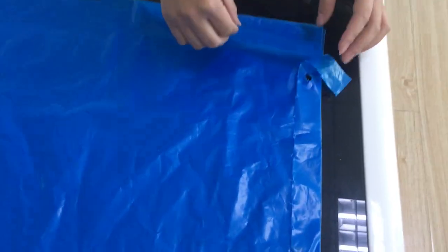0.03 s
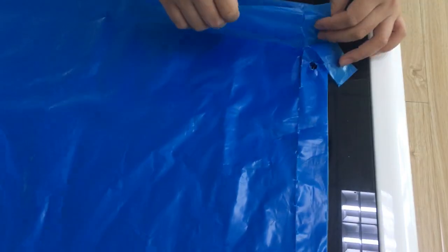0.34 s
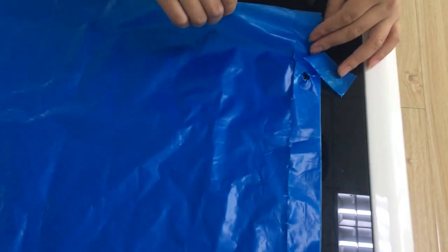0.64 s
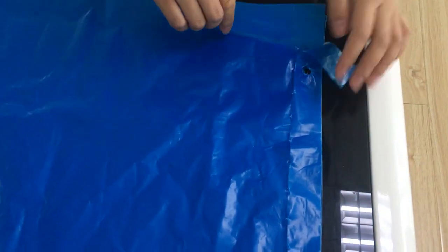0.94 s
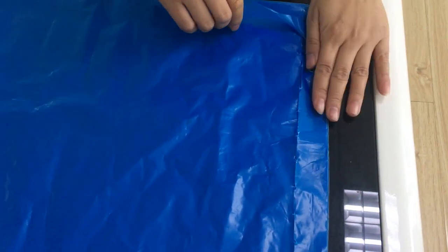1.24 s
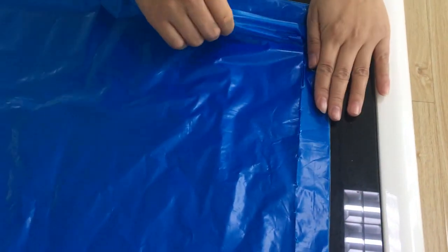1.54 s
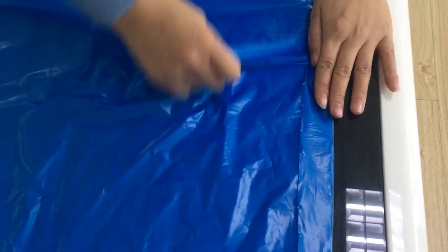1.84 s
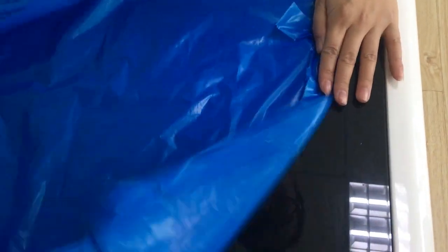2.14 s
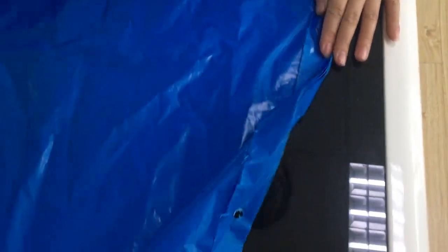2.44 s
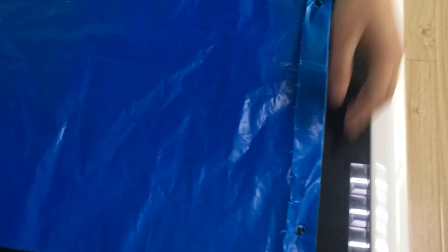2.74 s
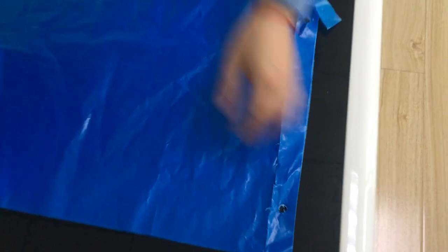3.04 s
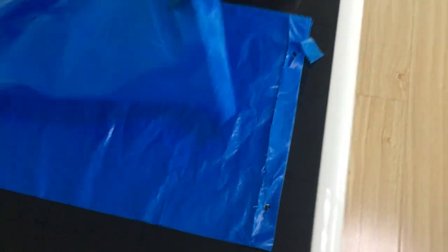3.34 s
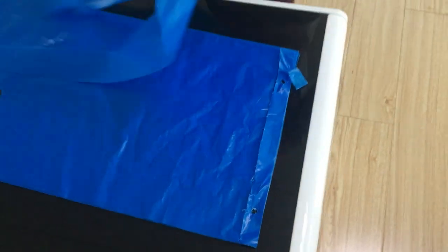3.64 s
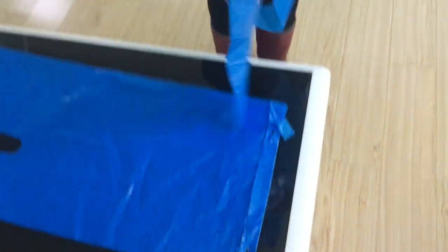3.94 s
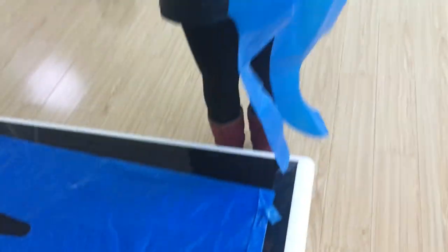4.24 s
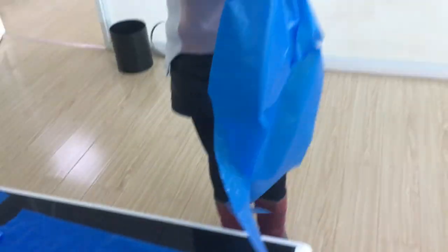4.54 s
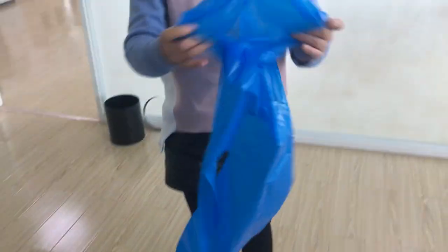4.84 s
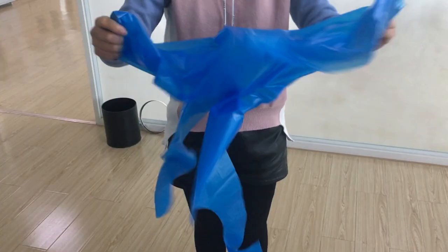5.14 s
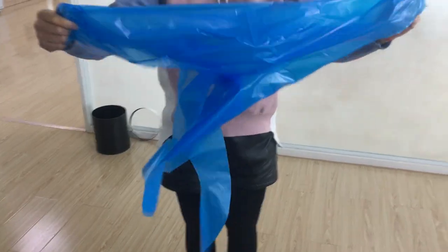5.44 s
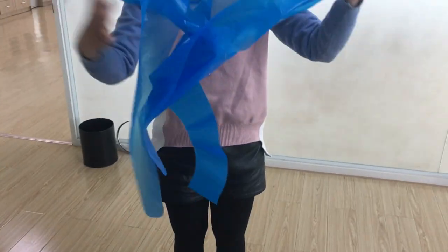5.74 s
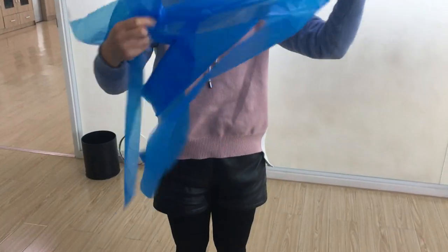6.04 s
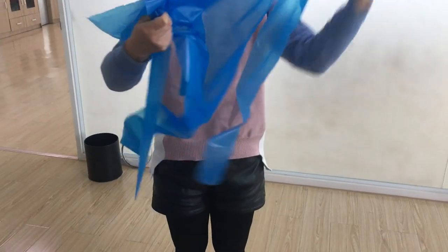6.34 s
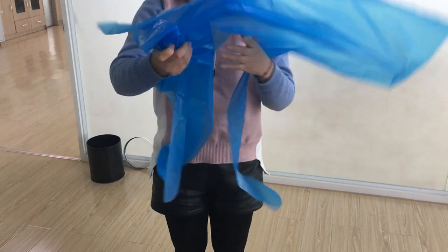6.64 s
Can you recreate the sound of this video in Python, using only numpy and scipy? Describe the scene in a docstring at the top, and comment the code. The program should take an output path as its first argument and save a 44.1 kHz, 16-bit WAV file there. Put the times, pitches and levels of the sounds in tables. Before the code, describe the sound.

A low ventilation rumble runs throughout, in a hard-floored room with a short echo. For the first second and a half, fingertips rub softly on a thin plastic apron close by, with a few faint ticks. At about 1.3 seconds a palm lands on the table with a soft, dull knock. From 1.8 seconds the plastic stretches and ticks, then rips off its pad between 2 and 2.3 seconds in a ragged zip of sharp snaps with a low swish. This is the loudest moment. From 2.5 to 4.6 seconds the loose sheet is lifted, giving quieter rustles, brushing swishes and scattered clicks. At about 4.8 seconds it is shaken open in bursts of dense, papery crackling, with a soft, low flap of air near 6.1 seconds. The crinkling eases off just before 7 seconds.

```python
"""Tearing off a plastic apron

A thin plastic apron is ripped off its pad on a table, in a hard-floored room with rumbling ventilation.
Fingertips rub the film, a hand lands on the table, and the perforation gives way in a run of snaps.
The loose sheet is lifted and shaken open: its creases buckle in dense crackles as it flaps the air."""
import sys
import numpy as np
from scipy import signal
from scipy.fft import rfft, irfft
from scipy.io import wavfile
from scipy.ndimage import uniform_filter1d

SR = 44100
rng = np.random.default_rng(int(sys.argv[2]) if len(sys.argv) > 2 else 0)


def store_pcm(level_fs):
    """Save levels as 16-bit WAV."""
    pcm = np.round(np.clip(level_fs, -1, 1) * 32767).astype(np.int16)
    wavfile.write(sys.argv[1], SR, np.atleast_2d(pcm).T)


N = 299880
TIME = np.arange(N) / SR

# The tone of the ventilation. Each row: frequency in Hz, relative level in dB.
VENTILATION_COLOUR = [(15, -32), (25, -43), (43, -9), (108, -9.5), (153, -7), (200, -5.5), (242, -10.5),
                      (344, -12.5), (439, -19), (659, -20), (796, -21), (1440, -21.5), (2760, -28.5),
                      (5000, -45), (16000, -46.5)]
# Low notes of the room that the ventilation keeps booming. Each row: pitch in Hz, width in Hz, level in dB.
ROOM_BOOMS = [(62, 8.2, -63), (102.7, 8, -65), (172, 19, -65.5)]
# Fingertips feel for the film's edge. Each row: peak time, rise and fall in seconds, relative level in dB.
FINGER_RUBS = [(0.02, .05, 0.47, -68.5), (0.345, 0.019, 0.1, -60.5), (0.55, .1, .05, -62.5),
               (0.815, .012, 0.11, -64.5), (1.23, 0.12, 0.25, -65.5), (1.52, .012, 0.049, -64.5)]
# The tone of the rubbed or rustling sheet. Each row: frequency in Hz, relative level in dB.
SHEET_COLOUR = [(140, -27), (240, -1), (347, 0.5), (511, -9), (996, -1.5), (1440, -2.5), (1910, 0.5),
                (2860, -2), (3230, -1.5), (7520, -6.5), (9120, -5.5), (10500, -8.5), (12100, -8),
                (15200, -11), (16000, -32)]
# A bridge in the perforation breaks or a crease flips.
# Each row: time in seconds, relative level in dB, pitch in Hz.
FILM_SNAPS = [(0.425, -41, 4200), (0.4382, -35, 9800), (0.7364, -46.5, 3280), (0.793, -49, 2580),
              (1.3033, -45, 8300), (1.3396, -44, 9200), (1.4953, -32, 7250), (1.528, -44, 4180),
              (1.6521, -45, 5600), (1.7923, -44, 5100), (1.8125, -33.5, 4970), (1.8355, -30, 5800),
              (1.8815, -32, 5470), (1.895, -24, 8200), (1.9465, -20, 9200), (1.9817, -16.5, 5700),
              (1.9912, -22, 6110), (2.004, -16.5, 3980), (2.0081, -17, 2980), (2.015, -15, 7500),
              (2.037, -17, 3950), (2.0553, -15, 2540), (2.0946, -16, 3960), (2.102, -16, 4400),
              (2.1151, -20, 2700), (2.1427, -13, 7400), (2.187, -18, 5940), (2.2246, -16, 5000),
              (2.251, -22, 4680), (2.275, -20.5, 4570), (2.2997, -25, 7400), (2.5297, -28, 6000),
              (2.6833, -20, 10300), (2.9767, -31, 8000), (3.0305, -30, 5800), (3.3087, -34.5, 4100),
              (3.339, -36, 3700), (3.4046, -30.5, 4970), (3.7773, -37, 3900), (4.565, -38, 6030),
              (5.3348, -25, 5000), (3.512, -27, 11600), (4.1804, -29.5, 6070), (4.341, -29, 10300),
              (4.3595, -30, 9500), (5.48, -25, 8500), (5.5275, -23.5, 8450), (5.938, -24.5, 10800),
              (6.1019, -26.5, 4000), (6.24, -26.5, 7900), (6.7702, -30, 7040)]
# The notes of the table top. Each row: pitch in Hz, width in Hz, relative level in dB.
TABLE_NOTES = [(327, 70, 4), (433, 100, 2), (580, 130, 4), (760, 270, 2), (920, 170, 2)]
# The tear runs along the pad.
# Each row: time in seconds, relative levels of wide folds and of fine creases in dB.
TEAR_LEVELS = [(1.85, -49.5, -64), (1.9, -47, -43), (1.975, -37, -35), (2.025, -36.5, -47),
               (2.06, -26, -31), (2.14, -27.5, -27), (2.275, -31.5, -36), (2.32, -42.5, -52),
               (2.42, -53, -78)]
# The tone of the tear. Each row: frequency in Hz, relative level in dB.
TEAR_COLOUR = [(150, -20), (250, -6.5), (538, -3.5), (662, 0.5), (761, 0.5), (1980, 3), (2710, -5),
               (3170, 1), (4990, -7), (6250, -4), (7570, -9), (8850, -6.5), (10400, -9.5), (12100, -8),
               (16000, -11)]
# The tear jumps ahead. Each row: start and length in seconds, boost in dB.
TEAR_SPURTS = [(2.005, 0.0078, 17.5), (2.05, 0.012, 4), (2.073, 0.0046, 7.5), (2.118, 0.014, 3)]
# The sheet swishes. Each row: peak time, rise and fall in seconds, relative level in dB,
# lowest and highest frequency in Hz.
SHEET_SWISHES = [(2.2, 0.15, 0.1, -39, 60, 226), (3.2, .02, 0.022, -54, 282, 870),
                 (3.445, 0.066, 0.07, -49.5, 282, 880), (6.14, 0.054, 0.094, -43.5, 46, 80)]
# The hanging sheet never quite rests. Each row: time in seconds, relative level in dB.
SHEET_STIRRING = [(2.36, -53.5), (2.9, -60), (3.75, -60), (4.3, -58.5), (4.6, -54.5), (5.3, -48),
                  (5.85, -55), (6.8, -54.5)]
# The hands move the loose sheet.
# Each row: peak time, rise and fall in seconds, relative level in dB, extra treble in dB.
HAND_MOVES = [(2.54, 0.042, .07, -54, 5), (2.66, .05, 0.088, -44.5, -0.5), (2.848, 0.0044, 0.057, -54, 2),
              (3.04, .008, 0.051, -52.5, -9), (3.189, 0.005, 0.031, -44.5, 0),
              (3.441, 0.083, 0.095, -43, -0.5), (3.781, 0.0068, 0.048, -51.5, -6),
              (3.965, 0.054, 0.076, -49.5, -3), (4.185, 0.0091, 0.072, -49.5, -4),
              (4.35, 0.0088, 0.072, -54.5, -1), (4.88, 0.072, 0.19, -45, 4.5),
              (5.01, 0.051, 0.27, -39.5, 2.5), (5.345, 0.05, 0.054, -39, 0.5),
              (5.5, 0.087, 0.073, -45.5, 3), (5.689, 0.05, 0.079, -41.5, 1.5),
              (5.95, .014, 0.23, -47.5, 2.5), (6.135, 0.062, 0.078, -36, 0.5), (6.44, 0.17, 0.092, -46, 1),
              (6.575, 0.056, .055, -43.5, -1), (6.78, 0.017, .06, -52.5, -1)]
# How long the room rings. Each row: frequency in Hz, seconds to fade by 60 dB.
ROOM_DECAY = [(200, 0.66), (1000, 0.61), (4000, 0.45), (14000, 0.39)]
# Echoes from table, body and floor. Each row: delay in seconds, level in dB against the direct sound.
CLOSE_ECHOES = [(.0029, -21.5), (.0066, -38), (0.017, -19.5), (0.0248, -20.5)]
# Peaks and dips of the microphone's opening. Each row: frequency in Hz, width in Hz, boost or cut in dB.
MICROPHONE_PORT = [(463, 34, 0), (587, 54, 1.5), (2700, 270, -1), (3480, 1200, 2.5), (7800, 930, -1.5),
                   (9200, 1500, 0), (10380, 410, -5)]


def from_db(db):
    """Turn decibels into a gain, a number to multiply a sound by."""
    return 10 ** (np.asarray(db) / 20)


def unit_power(x):
    """Scale a signal to an average power of one."""
    return x / np.sqrt(np.mean(x ** 2) + 1e-20)


def steady(x, window_s=0.046):
    """Even out the loudness but keep the fine grain."""
    power = np.abs(uniform_filter1d(x ** 2, int(window_s * SR)))
    return x / np.sqrt(power + 1e-12)


def gain_curves(rows, fade_s=0.017):
    """Make a gain curve from each dB column, fading out beyond the table's ends."""
    times, *columns = np.transpose(rows)
    inside = np.interp(TIME, [times[0] - fade_s, times[0], times[-1], times[-1] + fade_s], [0, 1, 1, 0])
    return [inside * from_db(np.interp(TIME, times, db)) for db in columns]


def swell(peak_s, rise_s, fall_s, db):
    """The gain of one gesture grows to a peak and dies away."""
    since = TIME - peak_s
    distance = np.abs(since) / np.where(since < 0, rise_s, fall_s)
    return from_db(db) * np.exp(-np.minimum(distance, 20))


def together(gains):
    """Combine the gains of unrelated sounds by adding their powers."""
    return np.sqrt(sum(gain ** 2 for gain in gains))


def drift(per_s):
    """A curve that wanders to a new random value per_s times a second."""
    points = rng.standard_normal(N // 20)
    return unit_power(np.interp(TIME * per_s, np.arange(len(points)), points))


def add(out, start_s, sound):
    """Mix a sound in at the given time."""
    i = int(np.clip(round(start_s * SR), 0, N - 1))
    out[i:i + len(sound)] += sound[:N - i]


def at_hz(table, hz):
    """Look up a frequency in a table, sliding smoothly between rows."""
    frequencies, values = np.transpose(table)
    return np.interp(np.log(hz + 1), np.log(frequencies), values)


def passband(x, hz, kind, order=2):
    """Let only the "low", the "high" or a "band" of frequencies through."""
    return signal.sosfilt(signal.butter(order, np.clip(hz, 10, .48 * SR), kind, fs=SR, output="sos"), x)


def resonance(x, hz, width_hz):
    """Ring at one pitch: the narrower the width, the longer the ring."""
    return signal.lfilter(*signal.iirpeak(hz, hz / width_hz, fs=SR), x)


def coloured(x, colour, size=8192):
    """Give a sound the tone set out in a colour table."""
    gains = from_db(at_hz(colour, np.linspace(0, SR / 2, size // 2 + 1)))
    cepstrum = irfft(np.log(gains))
    cepstrum[1:size // 2] *= 2   # folded so that the filter rings after a click, never before
    cepstrum[size // 2 + 1:] = 0
    return signal.fftconvolve(x, irfft(np.exp(rfft(cepstrum))))[:N]


def room(x, tail_db):
    """Direct sound, a few close echoes and a smooth tail that dies sooner in the treble."""
    t, response = TIME[:SR // 2], 0
    edges_hz = np.geomspace(80, 20480, 9)
    for low, high in zip(edges_hz, edges_hz[1:]):
        band = passband(rng.standard_normal(len(t)), [low, high], "band")
        response = response + band * 1000 ** (-t / at_hz(ROOM_DECAY, np.sqrt(low * high)))
    response *= 1 - np.exp(-t / 0.0072)
    response *= from_db(tail_db) / np.sqrt(np.sum(response ** 2))
    response[0] = 1   # the direct sound
    for delay_s, db in CLOSE_ECHOES:
        response[round(delay_s * SR)] += from_db(db)
    return signal.fftconvolve(x, response)[:N]


def moving_room(x, tail_db, paths=6):
    """The sheet keeps moving, so its clicks take different paths through the room."""
    path = rng.integers(0, paths, N)
    return sum(room(x * (path == k), tail_db) for k in range(paths))


def buckles(per_s, spread_db, limit=3.9):
    """Creases flip at random moments, making clicks of varied size."""
    sizes = from_db(spread_db * np.minimum(rng.exponential(1, N), limit))
    signs = rng.choice([-1, 1], N)
    return sizes * signs * (rng.random(N) < per_s / SR)


def ticks(per_s, spread_db, low_hz):
    """Tiny creases flip one by one, crisp and without echo."""
    return passband(buckles(per_s, spread_db, limit=2), low_hz, "high", order=1)


def crinkle(folds, creases, film, split_hz=5000):
    """Wide folds give the body of the crackle, fine creases the treble."""
    body = steady(passband(film, split_hz, "low", order=3))
    treble = steady(passband(film, split_hz, "high", order=3))
    return folds * body + creases * treble


def ventilation(air_db=-55):
    """Moving air rumbles steadily and makes the room's low notes boom."""
    air = from_db(air_db) * unit_power(coloured(rng.standard_normal(N), VENTILATION_COLOUR))
    return air + sum(from_db(db) * unit_power(resonance(rng.standard_normal(N), hz, width_hz))
                     for hz, width_hz, db in ROOM_BOOMS)


def fingertips(slide_db=-1, tick_db=-45):
    """Fingertips slide on the film; until it tears, tiny creases tick under them."""
    friction = room(buckles(per_s=900, spread_db=-1.5), tail_db=-5)
    slide = steady(coloured(friction, SHEET_COLOUR))
    rubbing = together(swell(*rub) for rub in FINGER_RUBS)
    gripping = TIME < TEAR_LEVELS[0][0]
    creases = from_db(tick_db) * gripping * ticks(per_s=16, spread_db=1.5, low_hz=8000)
    return from_db(slide_db) * rubbing * slide + creases


def snaps(level_db=-2, crack_db=-16, shiver_db=-17, shiver_cycles=12, neighbour_db=-7, mean_wait_s=.003):
    """Each snap rings a patch of film, leaves a duller shiver and sets off four neighbours."""
    out, t = np.zeros(N), TIME[:SR // 30]
    kick = signal.unit_impulse(len(t))
    for _ in range(14):   # smear the kick: in bending film the treble travels fastest
        kick = signal.lfilter([-0.58, 1], [1, -0.58], kick)
    for start_s, db, hz in FILM_SNAPS:
        patch = resonance(kick, hz, width_hz=min(hz / 1.2, SR / 4)) + from_db(crack_db) * kick
        patch *= from_db(db + level_db) / np.abs(patch).max()
        waves = unit_power(passband(rng.standard_normal(len(t)), [hz / 5, hz * 0.38], "band", order=1))
        shiver = waves * np.exp(-t * hz / shiver_cycles)   # lasts longer after low snaps
        add(out, start_s, patch + from_db(db + level_db + shiver_db) * shiver)
        for wait in rng.exponential(1, size=4):   # the later a neighbour flips, the weaker it is
            strength = from_db(neighbour_db) * np.exp(-wait / 2) * rng.choice([-1, 1])
            add(out, start_s + wait * mean_wait_s, strength * patch)
    return room(out, tail_db=-10.5)


def jolts(thud_hz=620, full_below_hz=2500, level_db=-13):
    """Snaps jolt the taut sheet into a brief thud; low ones move more film and thud harder."""
    out = np.zeros(N)
    ring = resonance(signal.unit_impulse(SR // 50), thud_hz, width_hz=900)
    thud = passband(ring, 2 * thud_hz, "low")
    thud /= np.abs(thud).max()
    for start_s, db, snap_hz in FILM_SNAPS:
        share = min(full_below_hz / snap_hz, 1) ** 2
        add(out, start_s, from_db(db + level_db) * share * thud)
    return room(out, tail_db=-9)


def knock(start_s=1.26, level_db=-33.5, patter_s=0.02, palm_push=14.5):
    """A palm lands on the dull-sounding table top and the fingers patter after it."""
    out, t = np.zeros(N), TIME[:SR // 4]
    push = rng.standard_normal(len(t)) * np.exp(-t / patter_s)
    push[0] += palm_push
    ring = sum(from_db(db) * resonance(push, hz, width_hz) for hz, width_hz, db in TABLE_NOTES)
    thump = passband(ring, 1100, "low", order=6)
    add(out, start_s, from_db(level_db) * thump / np.abs(thump).max())
    return room(out, tail_db=-8)


def tear(clump_db=4.5, tick_db=9, level_db=-4.5):
    """The film stretches, ticking, and gives way in a ragged zip between the big snaps."""
    clicks = buckles(per_s=3500, spread_db=2, limit=4.1) * from_db(clump_db * drift(220))
    film = coloured(moving_room(clicks, tail_db=-8), TEAR_COLOUR)
    spurt_db = sum(db * ((TIME > start) & (TIME < start + length)) for start, length, db in TEAR_SPURTS)
    folds, creases = gain_curves(TEAR_LEVELS)
    ticking = from_db(tick_db) * creases * ticks(per_s=230, spread_db=3.5, low_hz=3500)
    return from_db(level_db) * (from_db(spurt_db) * crinkle(folds, creases, film) + ticking)


def flaps(level_db=-0.5):
    """The sheet billows off the pad, brushes over it and later swings through the air."""
    out = np.zeros(N)
    for *gesture, low_hz, high_hz in SHEET_SWISHES:
        swish = passband(rng.standard_normal(N), [low_hz, high_hz], "band")
        out += swell(*gesture) * steady(swish, window_s=0.044)
    return from_db(level_db) * out


def handling():
    """Hand moves and a gentle stirring set the gains of wide folds and fine creases."""
    stir, = gain_curves(SHEET_STIRRING)
    moves = [(stir, 0)] + [(swell(*gesture), treble_db) for *gesture, treble_db in HAND_MOVES]
    folds = together(gain for gain, _ in moves)
    creases = together(gain * from_db(treble_db) for gain, treble_db in moves)
    return folds, creases


def rustle(clump_db=4, ring_db=-5, tick_db=-39, level_db=-2.5):
    """The loose sheet crackles and ticks; held up and spread out, it gains a papery ring."""
    clicks = buckles(per_s=4500, spread_db=4) * from_db(clump_db * drift(90))
    film = coloured(moving_room(clicks, tail_db=1.5), SHEET_COLOUR)
    spread_out = np.interp(TIME, [4.78, 4.9, 5.2, 5.6], [0, 1, 1, 0])
    film = film + from_db(ring_db) * spread_out * resonance(film, hz=3300, width_hz=330)
    folds, creases = handling()
    vigour = np.sqrt(creases / creases.max())   # lone ticks grow more slowly than the crackle
    ticking = from_db(tick_db) * vigour * ticks(per_s=100, spread_db=8.5, low_hz=3500)
    return from_db(level_db) * (crinkle(folds, creases, film) + ticking)


def scene():
    """Add all the sounds into one channel."""
    return (ventilation() + fingertips() + snaps() + jolts() + knock() + tear() + flaps() + rustle())[None]


def record(dry, low_cut_hz=28, high_cut_hz=15900):
    """The microphone's opening colours the sound; the deepest bass and highest treble are cut."""
    for hz, width_hz, db in MICROPHONE_PORT:
        dry = dry + (from_db(db) - 1) * resonance(dry, hz, width_hz)
    dry = passband(dry, low_cut_hz, "high", order=3)
    return signal.sosfilt(signal.ellip(12, .1, 80, high_cut_hz, fs=SR, output="sos"), dry)


dry = scene()
out = record(dry)
store_pcm(out)
```